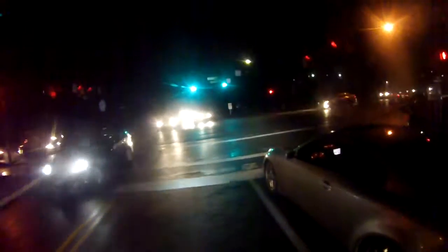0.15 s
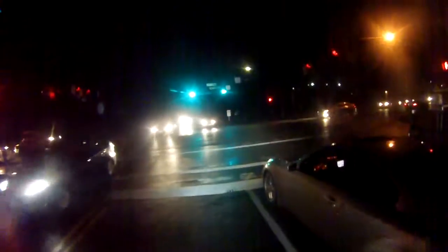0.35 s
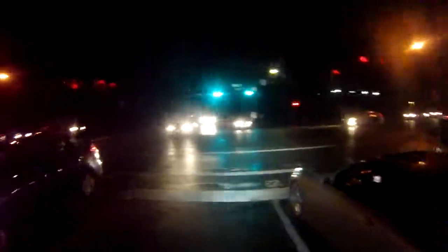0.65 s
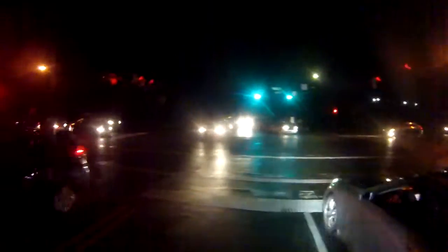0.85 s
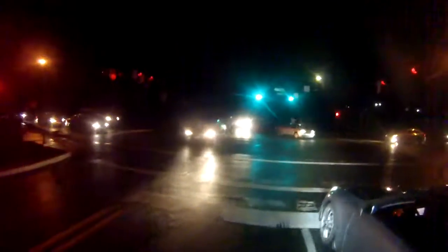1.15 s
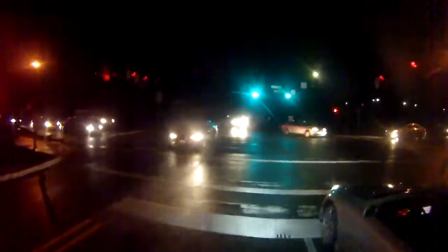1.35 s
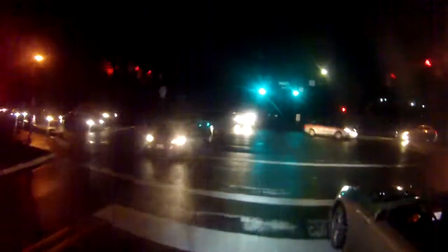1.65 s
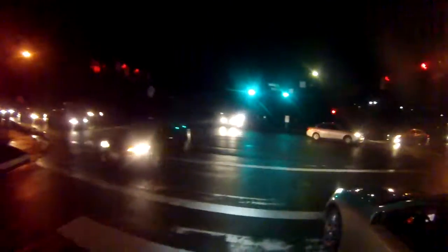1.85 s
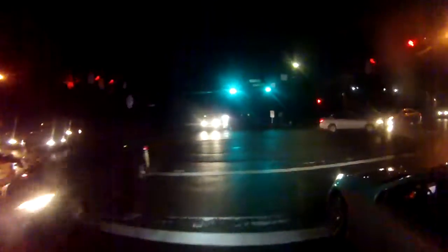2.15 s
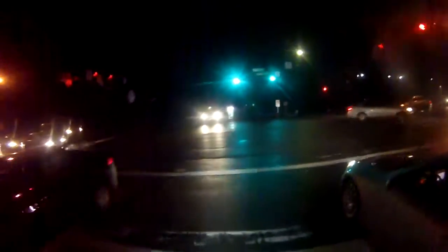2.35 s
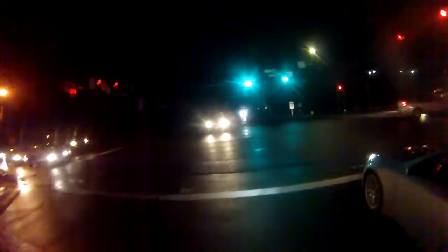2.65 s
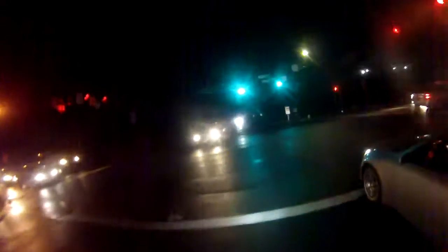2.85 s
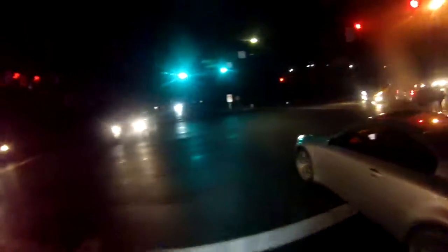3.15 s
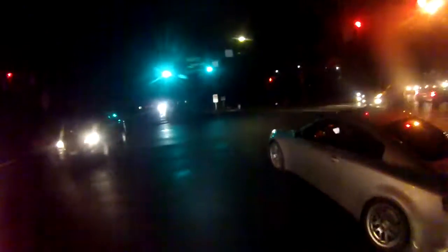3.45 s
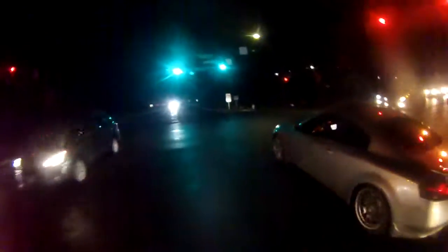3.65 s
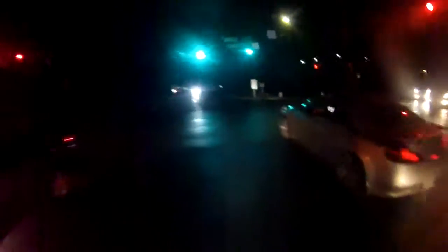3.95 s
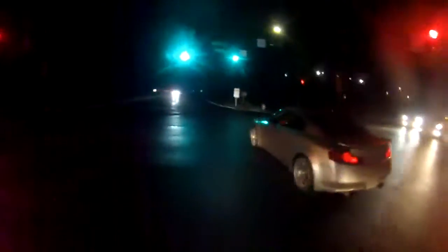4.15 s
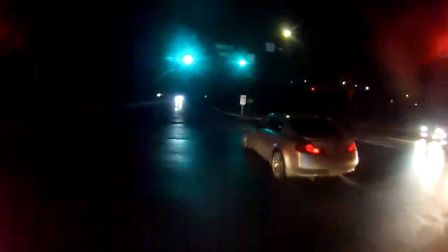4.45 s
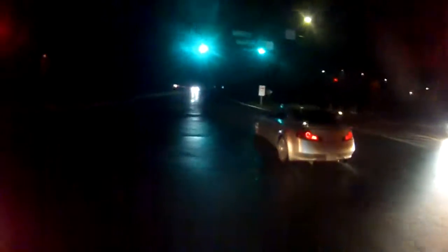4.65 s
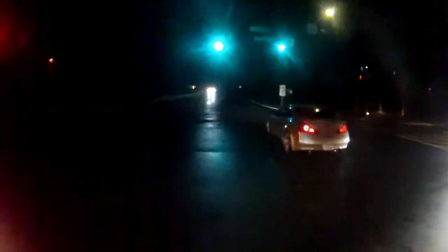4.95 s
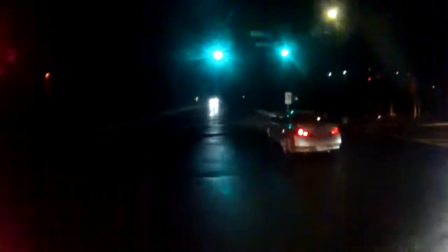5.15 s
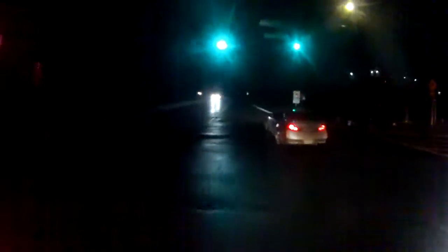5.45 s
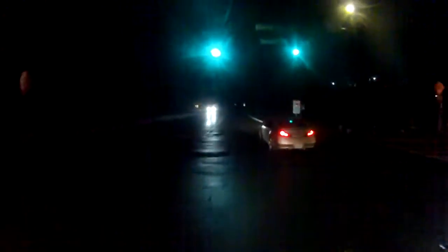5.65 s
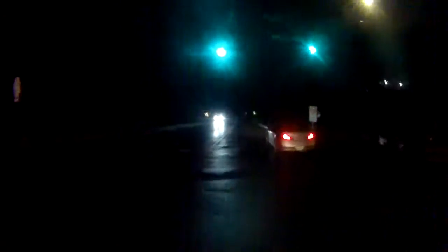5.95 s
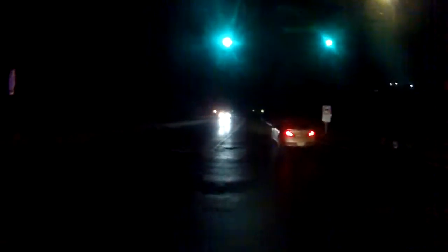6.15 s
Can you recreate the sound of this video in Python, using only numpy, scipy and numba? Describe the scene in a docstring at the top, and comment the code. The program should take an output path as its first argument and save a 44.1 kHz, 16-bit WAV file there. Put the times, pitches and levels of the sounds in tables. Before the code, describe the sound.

Heard from inside a closed housing on the rider's helmet, a motorcycle burbles low at a wet night junction, then pulls away with a smoothly rising, buzzing drone. Cars pass as soft muffled whooshes. Near the top the tone throbs, then falls away for a gear change; sharp double knocks hit the mount and the engine returns at a lower pitch, building again through wind.

```python
"""Motorcycle pulling away from a wet junction

A motorcycle waits, pulls away and changes gear, heard by a camera in a closed housing on the helmet.
Engine orders, sums of cosines locked to the firing phase, boom over shaped noise for traffic, tyres and wind.
Damped sines make the small parts tick and the bumps jolt the mount.
A fast gain control ducks at high peaks, then a bass cut thins the sound."""
import sys
import numpy as np
from scipy import signal
from scipy.fft import rfft, irfft, next_fast_len
from scipy.io import wavfile
from scipy.ndimage import uniform_filter1d, map_coordinates
from numba import njit

SR = 44100
rng = np.random.default_rng(int(sys.argv[2]) if len(sys.argv) > 2 else 0)


def store_pcm(level_fs):
    """Save levels as 16-bit WAV."""
    pcm = np.round(np.clip(level_fs, -1, 1) * 32767).astype(np.int16)
    wavfile.write(sys.argv[1], SR, np.atleast_2d(pcm).T)


N = 278094

# All source levels are relative: the sources, the shell and the gain control scale them further.
# Spectra of the noises: pitch_hz, density_db (relative, per Hz)
BUFFET_SPECTRUM = [(25, -28), (45, -8), (80, -4), (120, 0), (200, 0.5), (330, -8.5), (520, -3.5),
                   (800, -56.5), (2000, -120)]
ROAR_SPECTRUM = [(150, -47.5), (250, -7.5), (372, -3), (581, -2.5), (775, -4.5), (930, -10), (1000, -15.5),
                 (1250, -25), (1390, -18.5), (1800, -32.5), (2340, -43), (3960, -120)]
HISS_SPECTRUM = [(700, -31), (1250, -9.5), (1380, -1.5), (1600, -12), (1900, -1), (2300, -13),
                 (3000, -16.5), (3800, -15.5), (4300, -23), (4900, -22), (5600, -30.5), (8000, -39.5),
                 (13000, -53)]
# Wind gusts: centre_s, half_width_s, peak_db
GUSTS = [(1.36, .2, -38.5), (2.46, .15, -40), (3.1, .25, -36.5), (3.64, .1, -37.5), (4.41, .13, -32),
         (5.1, .1, -33.5), (6.28, .15, -35.5)]
# Passing cars: centre_s, half_width_s, roar_db, tyre_hiss_db
PASSING_CARS = [(1.1, 0.14, -44, -61), (1.55, 0.14, -55, -58.5), (2.2, 0.31, -48, -58.5),
                (2.95, 0.26, -36.5, -58), (3.51, .12, -35, -62), (4.349, .25, -37, -60.5),
                (6.3, 0.16, -37, -71)]
ROLL_S, CRUISE_S = 2.2, 4.3  # the wheels start to turn, the speed levels off
CALM_DB, WIND_DB = -42, -37  # wind buffet at a standstill and at speed
TRAFFIC_DB, ROAD_DB = -42.5, -37.5  # roar at a standstill and at speed
SPRAY_DB = -62  # steady hiss of the wet road

# Jolts of the mount: start_s, peak_db, pitch_hz, direction (sign)
BUMPS = [(1.6995, -11, 420, -1), (4.164, -18.5, 260.5, -1), (5.0125, -18, 300.4, 1),
         (5.0148, -8, 400.5, -1), (5.0222, -19, 297, 1), (5.028, -7.5, 430, -1), (5.1225, -21, 233, -1),
         (5.173, -20, 330, -1)]
# Ticks of small parts: start_s, peak_db, favoured_hz
TICKS = [(0.8781, -43, 1537), (1.7008, -35.5, 1456), (2.6442, -37.5, 1427), (2.6908, -37.5, 1448),
         (3.839, -32, 1440), (3.8684, -19.5, 1460), (5.406, -35.5, 1818), (5.518, -40, 2400),
         (6.012, -38, 1950)]
# Modes of the housing: pitch_hz, level_db, t60_s
HOUSING_MODES = [(1463, 1.8, 0.015), (1861, 0.8, 0.026), (2650, -5, 0.022), (3500, 4.5, .008)]
FAVOUR_DB = 36.5  # loss of a mode an octave away from the favoured pitch

# Engine in first and second gear: time_s, firing_hz, load_db, half_orders_over_load_db, upper_orders_db
ENGINE_GEARS = [
    [(0.0, 61.1, -44, -17, -49), (0.17, 64.4, -46.5, -16, -58), (0.45, 72.6, -39.5, -17, -50),
     (0.74, 63.7, -35, -17, -51), (1.21, 57.5, -29.5, -15, -40.5), (1.57, 61.49, -28.5, -13, -42),
     (2.1, 59.65, -29, -17.5, -43.5), (2.31, 69.42, -28.5, -13, -40.5), (2.67, 87.8, -28.5, -5.5, -33.5),
     (2.89, 100.2, -30.5, -2.5, -29.5), (3.21, 117.7, -30.5, 3, -30.5), (3.57, 139.7, -29, 2.5, -28.5),
     (3.99, 161.3, -29.5, 0, -25), (4.11, 158.8, -32.5, -1, -29), (4.3, 156.5, -38.5, -6.5, -45.5),
     (4.5, 159, -42.5, 3, -43)],
    [(5.2, 117, -45.5, 2, -52), (5.526, 104.3, -49.5, 8.5, -43.5), (5.62, 109, -46.5, 10, -43),
     (5.792, 109.8, -46, 6.5, -36.5), (5.998, 113.7, -35, -1, -31.5), (6.27, 121.6, -29.5, -5.5, -31.5)],
]
# Low and upper engine orders: order (multiple of firing rate), first_gear_db, second_gear_db
LOW_ORDERS = [(.5, -13, -16.5), (1, 0, -2.1), (1.5, 0.24, -0.7), (2, -6, 2)]
UPPER_ORDERS = [(2.5, -14, -13), (3, -8, -1.5), (3.5, -11, -22), (4, -4, -3.5), (4.5, -9, 2),
                (5, -8.5, -12), (5.5, -11, -9), (6, -12.5, -9), (7, -13.5, -12.5)]
# Colour of the low and of the upper orders: pitch_hz, level_db
BOOM_COLOUR = [(30, -8), (50, -1), (60, 0.35), (120, -1), (148, 4), (162, 0.34), (185, 0.66), (225, -8.5),
               (255, -10.5), (277, 7), (305, -8)]
PIPE_COLOUR = [(100, -8.5), (180, 0), (250, -15), (350, -11), (398, 5), (440, -3.5), (500, 1.5), (560, -1),
               (610, -10), (900, -14.5), (1300, -30)]
# An order swells or fades around one engine speed: order, firing_hz, half_width_hz, level_db
BLOOMS = [(5.5, 71, 4, 9.5), (5, 79, 4, 8), (4, 97, 6.6, 2.5), (3.5, 116, 7.8, 12.5), (4, 130, 11, 8),
          (3, 149, 18, 13.5), (3.5, 160, 9, -9.5)]
# Start of one throb in each gear: start_s
THROB_STARTS = (3.918, 6.136)
# Throb depth, growing as each gear winds up: time_s, depth_db
THROB_DEPTH = [(0, 0.5), (3.2, 4), (3.8, 16.5), (4.2, 16.5), (5.2, 2.5), (5.9, 5.5), (6.1, 12)]
FIRINGS_PER_THROB = 6.2
SECOND_GEAR_S = 5  # the gear settings switch here

# Whine of the camera's electronics: pitch_hz, level_db (rms)
WHINE = [(9001, -102), (10497, -107), (11999, -90.5), (13501, -104)]
CUT_HZ, TOP_HZ = 400, 14000  # corner of the bass cut, upper band limit


def amp(db):
    """Decibel law: the gain of a level in dB."""
    return 10 ** (np.asarray(db) / 20)


def unit(x):
    """Normalisation: x at rms 1."""
    return x / np.sqrt(np.mean(x ** 2) + 1e-20)


def along(points, hz):
    """Interpolation of (Hz, value) points on a logarithmic frequency axis."""
    f, v = np.transpose(points)
    return np.interp(np.log(hz + 1), np.log(f + 1), v)


def curves(rows):
    """Linear interpolation in time: one curve for each column after the time."""
    s, *cols = np.transpose(rows)
    return [np.interp(np.arange(N) / SR, s, c) for c in cols]


def wobble(rate):
    """Slow random modulation: a smooth curve with rate knots a second."""
    knots = rng.standard_normal(int(N * rate / SR) + 4)
    return map_coordinates(knots, [np.arange(N) * rate / SR])


def filtered(x, response):
    """Linear filtering: the spectrum of x times a complex response of frequency."""
    m = next_fast_len(N + SR // 2)
    return irfft(rfft(x, m) * response(np.fft.rfftfreq(m, 1 / SR)), m)[..., :N]


def rush(spectrum, patchy_db):
    """Turbulent noise of rms 1: random gain in time-frequency patches, then a spectral shape."""
    z = signal.stft(rng.standard_normal(N), nperseg=512)[2]
    field = uniform_filter1d(rng.standard_normal(z.shape), size=6, axis=0)
    field = uniform_filter1d(field, size=8, axis=1)
    noise = signal.istft(z * amp(patchy_db * unit(field)), nperseg=512)[1][:N]
    return unit(filtered(noise, lambda hz: amp(along(spectrum, hz))))


def swells(rows, floor_db):
    """Inverse-square law: a floor plus the powers of passing point sources, in dB."""
    t = np.arange(N) / SR
    passes = sum(amp(db) ** 2 / (1 + ((t - s) / width) ** 2) for s, width, db in rows)
    return 20 * np.log10(np.sqrt(amp(floor_db) ** 2 + passes))


def street():
    """Broadband flow and road noise: lumpy wind buffet, traffic roar and the tyre hiss of a wet road."""
    speed, = curves([(ROLL_S, 0), (CRUISE_S, 1)])
    buffet_db = swells(GUSTS, CALM_DB + (WIND_DB - CALM_DB) * speed)
    roar_db = swells([car[:3] for car in PASSING_CARS], TRAFFIC_DB + (ROAD_DB - TRAFFIC_DB) * speed)
    hiss_db = swells([(s, width, db) for s, width, _, db in PASSING_CARS], SPRAY_DB)
    lumps = amp(2.5 * wobble(16))
    buffet = amp(buffet_db + 3) * unit(lumps * rush(BUFFET_SPECTRUM, patchy_db=0.5))
    roar = amp(roar_db + 3.5 + 0.7 * wobble(9)) * rush(ROAR_SPECTRUM, patchy_db=1.5)
    return buffet + roar + amp(hiss_db) * rush(HISS_SPECTRUM, patchy_db=1.5)


def bumps():
    """Damped free vibration: each jolt rings at its pitch, with a weaker ring below."""
    t60, attack = 0.017, 0.0007  # seconds
    out, t = np.zeros(N + SR), np.arange(SR // 20) / SR
    for s, db, hz, direction in BUMPS:
        ring = np.sin(2 * np.pi * hz * t) * amp(-60 * t / t60)
        ring += .4 * np.sin(2 * np.pi * 0.725 * hz * t) * amp(-35 * t / t60)
        onset = 1 - np.exp(-(t / attack) ** 2)
        out[round(s * SR):][:len(t)] += np.sign(direction) * amp(db + 6) * ring * onset
    return out[:N]


def ticks():
    """Modal excitation: each tick rings the housing, most of all the modes near its favoured pitch."""
    out, t = np.zeros(N + SR), np.arange(SR // 20) / SR
    onset = 1 - np.exp(-(t / 0.00048) ** 2)
    for s, db, favoured in TICKS:
        ring = 0
        for hz, level, t60 in HOUSING_MODES:
            mode_db = level - FAVOUR_DB * abs(np.log2(hz / favoured))
            ring = ring + amp(mode_db - 60 * t / t60) * np.sin(2 * np.pi * hz * t)
        out[round(s * SR):][:len(t)] += amp(db + 5) * ring * onset
    return out[:N]


def in_gear(first, second):
    """Piecewise setting: one value for each gear."""
    return np.where(np.arange(N) < SECOND_GEAR_S * SR, first, second)


def coast(row, s):
    """Unloaded engine: with the clutch in, load and upper orders drop by 15 dB."""
    return s, row[1], row[2] - 15, row[3], row[4] - 15


def throb_gain(turn):
    """Periodic amplitude modulation: a sawtooth in dB, locked to the firing phase, with rounded edges."""
    start = in_gear(*turn[np.round(np.array(THROB_STARTS) * SR).astype(int)])
    since = (turn - start) / (FIRINGS_PER_THROB * 2 * np.pi) % 1
    depth_db, = curves(THROB_DEPTH)
    throb = amp(depth_db * (.4 - since))
    return uniform_filter1d(uniform_filter1d(throb, size=120), size=120)


def bloom(order, firing_hz):
    """Resonance crossing: the level change in dB of an order near given engine speeds."""
    return sum(db * np.exp(-((firing_hz - at_hz) / width) ** 2)
               for k, at_hz, width, db in BLOOMS if abs(k - order) < .25)


def engine():
    """Harmonic synthesis: orders of the firing rate, of which the upper ones flutter and throb."""
    first_gear, second_gear = ENGINE_GEARS
    shift = [coast(first_gear[-1], 4.6), coast(second_gear[0], 5.1)]
    hz, load, half, upper = curves([*first_gear, *shift, *second_gear])
    turn = 2 * np.pi * np.cumsum(hz) / SR  # firing phase in radians
    throb = throb_gain(turn)
    lead = 0.98  # shared phase (radians): the low orders peak together once they have passed the shell
    boom = 0
    for k, *gear_db in LOW_ORDERS:
        db = load + in_gear(*gear_db) + half * (k % 1 > 0) + along(BOOM_COLOUR, k * hz)
        boom = boom + amp(db + 1 + .6 * wobble(14)) * np.cos(k * turn + lead + 0.12 * wobble(20))
    rasp = 0
    for k, *gear_db in UPPER_ORDERS:
        db = upper + in_gear(*gear_db) + bloom(k, hz) + along(PIPE_COLOUR, k * hz)
        phase = k * turn + .3 * wobble(22) + rng.uniform(0, 6)
        rasp = rasp + amp(db + 1.1 * wobble(18)) * np.cos(phase)
    return np.sqrt(2) * (boom + throb * rasp)


def scene():
    """Superposition and transmission: all sources pass the shell, which favours the bass."""
    sound = street() + bumps() + ticks() + engine()
    return filtered(sound, lambda hz: (1j * hz + CUT_HZ) / (1j * hz + 25))[None]


@njit
def ducking(x, top, release_at, step, fall_wait, rise_wait, uneven):
    """Feedback gain control: a peak over top steps the gain down to release_at; slow steps lead back to 1."""
    gain, aim, falling, wait = np.empty(len(x)), 1., False, 0.
    for i in range(len(x)):
        out = abs(x[i]) * aim
        if out > top and not falling:
            falling, wait = True, 0.
        wait -= 1
        if wait <= 0:
            falling = falling and out > release_at
            aim = aim * step if falling else min(aim / step, 1.)
            wait = (fall_wait if falling else rise_wait) * uneven[i]
        gain[i] = aim
    return gain


def record(dry):
    """Signal chain: gain control, bass cut, the whine of the electronics and the band limit."""
    uneven = amp(5 * rng.standard_normal(N))  # random factor on each wait between steps
    steps = ducking(dry[0], top=.46, release_at=.15, step=amp(-1.5),
                    fall_wait=.0002 * SR, rise_wait=.002 * SR, uneven=uneven)
    # the amplifier rounds off each step
    gain = 1 + filtered(steps - 1, lambda hz: 1 / (1 + 1j * hz / 750) / (1 + 1j * hz / 5600))
    thin = filtered(dry * gain, lambda hz: 1j * hz / (1j * hz + CUT_HZ) * (1j * hz / (1j * hz + 14)) ** 2)
    t = np.arange(N) / SR
    whine = sum(amp(db) * np.sqrt(2) * np.sin(2 * np.pi * hz * t) for hz, db in WHINE)
    return filtered(thin + whine, lambda hz: hz < TOP_HZ)


dry = scene()
out = record(dry)
store_pcm(out)
```